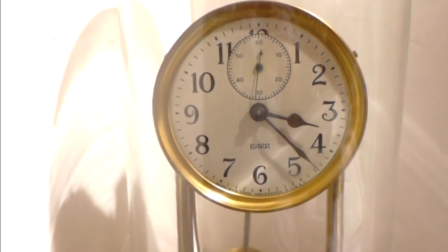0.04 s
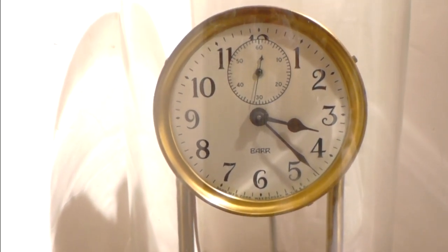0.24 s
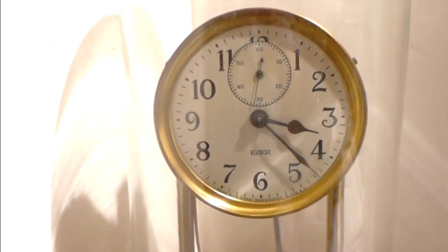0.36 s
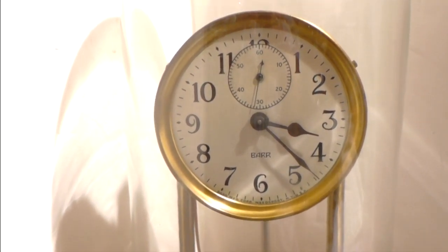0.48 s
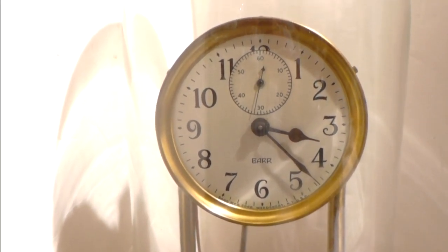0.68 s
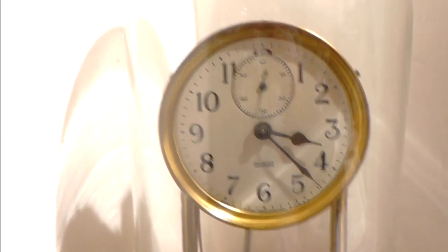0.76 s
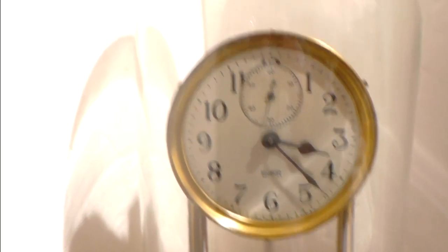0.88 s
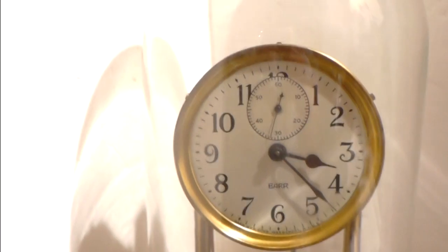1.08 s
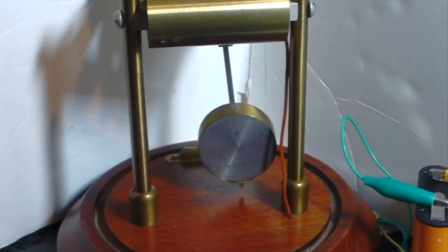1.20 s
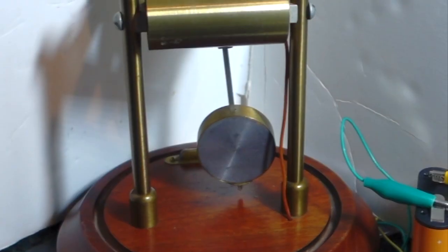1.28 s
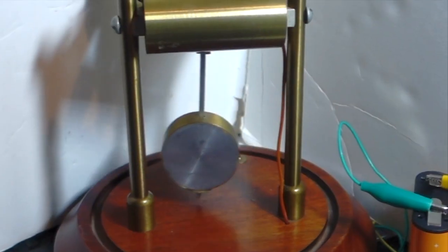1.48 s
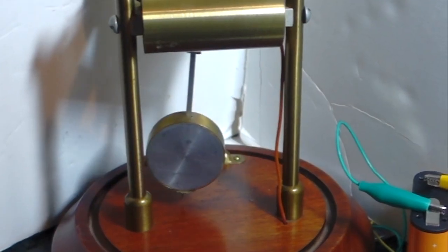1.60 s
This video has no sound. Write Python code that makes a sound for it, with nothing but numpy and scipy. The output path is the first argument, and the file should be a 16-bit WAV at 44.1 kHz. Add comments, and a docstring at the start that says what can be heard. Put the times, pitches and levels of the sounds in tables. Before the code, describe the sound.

An electric pendulum clock clicks close by, slightly right, over steady hiss in a small room. After a soft rub, a ratchet knocks and drags from 0.1 to 0.4 seconds. At 0.6 a lever clacks loudly, ringing the brass case. Light ticks and a rub follow. The sound drops out briefly near 1.2, returning with thinner hiss. Around 1.6 a contact chatters and a last rub begins.

```python
"""An electric pendulum clock, close by and a little to the right, in a small room with steady hiss.
After a soft rub, a pawl knocks and drags over a ratchet wheel (0.11-0.44 s).
A lever drops with a loud clack that rings the brass case (0.57 s). Light ticks and a rub follow.
After a short silence (1.24 s) the hiss is thinner; the pendulum contact closes and chatters (1.57 s),
and a last rub begins."""
import sys
import numpy as np
from scipy import signal
from scipy.fft import rfft, irfft
from scipy.io import wavfile

SR = 44100
rng = np.random.default_rng(int(sys.argv[2]) if len(sys.argv) > 2 else 0)


def int16_out(signal):
    """Quantize to a 16-bit WAV file."""
    q = np.round(np.clip(np.atleast_2d(signal).T, -1, 1) * 32767)
    wavfile.write(sys.argv[1], SR, q.astype(np.int16))


N = 72765

# Stereo image: freq_hz, right_minus_left_db
STEREO_LEAN = [(200, 0), (600, 1), (1100, 2), (2000, 5.5), (3600, 9), (6400, 8), (11000, 8)]
# Left-right likeness: freq_hz, correlation
STEREO_COHERENCE = [(60, 0.88), (300, 0.93), (650, 0.75), (1200, 0.69), (2500, 0.31), (5400, 0.041),
                    (11000, 0.011)]
# Hiss spectra before and after the silence: freq_hz, relative_db
FULL_HISS_SPECTRUM = [(30, -29), (65, -14), (110, -10.5), (240, -1.5), (480, -3.5), (630, 3.5), (760, -1.5),
                      (920, 4), (1420, 2.5), (1950, 4), (2300, -2), (3200, -7), (4200, -7.5), (5500, -10.5),
                      (11000, -10.5)]
THIN_HISS_SPECTRUM = [(30, -38), (100, -37), (200, -16.5), (480, -17), (640, -4), (820, -6.5), (950, -2.5),
                      (1200, -4.5), (1400, -8), (1850, 0), (2500, -11), (3500, -15), (4000, -12),
                      (5500, -16), (11000, -15)]
# Hollow notes in the hiss: pitch_hz, width_hz, level_db
ROOM_RESONANCES = [(623, 67, -80.5), (948, 87, -72.5), (1210, 27, -76), (1748, 76, -81), (1945, 45, -80.5)]
# Strokes of a sliding part: start_s, length_s, level_db
RUB_STROKES = [(-.028, .135, -3), (0.974, .14, 0.5), (1.594, 0.2, 1.5)]
# Resonances of the rub: pitch_hz, width_hz, level_db, peak_stroke_fraction
RUB_RESONANCES = [(2347, 26, -60.5, 0.087), (2730, 68, -68, 0.18), (3910, 850, -66, 0.37),
                  (7920, 240, -79, .5), (10570, 2200, -67, 0.49)]
# Gear train ticks: start_s, level_db, centre_hz, width_octaves, decay_s
GEAR_TICKS = [(.837, -49, 8000, .25, 0.0017), (0.8797, -33.5, 2540, 0.4, 0.0012),
              (.8848, -38, 3000, 0.49, 0.0012), (.931, -46.5, 4630, 0.5, 0.0013),
              (.9315, -41.5, 240, 0.44, 0.0087), (1.1676, -35.5, 2910, 0.47, 0.0015),
              (1.404, -58.5, 4740, 1.7, 0.0088)]
# Impacts: start_s, level_db, treble_db, rise_s
CONTACT_BLOWS = [(1.5665, 0.5, 2, 0.00095), (1.585, 2, -3, .001), (1.598, 3.5, -6, 0.0016),
                 (1.609, 1, -9, 0.0017)]
PAWL_BLOWS = [(.1125, -0.5, 0.5, .0015), (.1175, -4, -5, 0.0027), (.1228, -4.5, -38, .002),
              (.1335, -12.5, 9, 0.00068), (.190, -11, -4.5, 0.0061), (.267, -25.5, 6, .002),
              (.285, -17, 3, 0.005), (.3065, -7, 1.5, 0.0057), (.3285, -3, -0.5, 0.0053),
              (.356, -12, 6.5, 0.0063), (.377, -20, 9, 0.0049), (.398, -10.5, 4.5, 0.0013),
              (.4255, -10.5, 3.5, 0.0043), (.443, -12.5, -43, 0.0022)]
LEVER_BLOWS = [(.5700, -7.5, -3.5, .002), (.5730, -2.5, -0.5, 0.0029), (.5760, -2, -0.5, 0.0025),
               (.5885, -8.5, 2, 0.0017), (.5940, -11.5, 1.5, 0.0017)]
# Dense response of each struck body: freq_hz, ring_db, t60_s, direct_db
SPRING_BODY = [(200, -84, 0.11, -77), (2020, -47, .1, -73), (3080, -58, 0.16, -42.5), (3470, -61, .12, -52),
               (4080, -54, 0.13, -38), (4600, -49.5, 0.16, -56), (6540, -62, 0.18, -51),
               (11100, -57, 0.14, -44)]
MOVEMENT_BODY = [(50, -64, .3, -65), (131, -51, 0.5, -64), (278, -33, 0.53, -49), (430, -33, 0.41, -43),
                 (610, -26.5, 0.31, -19.5), (760, -36, 0.39, -41), (1130, -28.5, 0.22, -22.5),
                 (1800, -39.5, 0.27, -41), (2400, -37, 0.13, -34), (2800, -40.5, 0.23, -46),
                 (3400, -35.5, 0.21, -34), (3690, -43.5, 0.18, -46), (4300, -36.5, 0.13, -42),
                 (4600, -48, 0.21, -67), (5500, -39, 0.096, -38), (5970, -42.5, 0.14, -47),
                 (7200, -35, 0.22, -29.5), (7060, -45, .14, -45), (8000, -32, 0.081, -38.5),
                 (9170, -45, 0.17, -45.5), (11000, -40.5, .16, -38)]
CASE_BODY = [(50, -71, 0.23, -64), (166, -51.5, 0.48, -46), (378, -49, 0.71, -39), (656, -26.5, 0.29, -25),
             (1120, -30.5, 0.45, -31.5), (1940, -29.5, 0.54, -15.5), (2600, -28.5, 0.45, -14.5),
             (3100, -37, 0.44, -26.5), (3760, -32.5, 0.39, -28.5), (5200, -39.5, 0.37, -36.5),
             (6700, -41, 0.46, -33), (7500, -43, 0.43, -37), (9100, -40, 0.4, -41),
             (10900, -41, 0.31, -30.5)]
# Clear modes of each struck body: pitch_hz, level_db, t60_s, right_minus_left_db
SPRING_PARTIALS = [(3975, -63.5, 0.11, 11), (3970, -58, 0.051, 14), (7900, -63, 0.089, 6),
                   (8800, -55, 0.071, 7.4), (10840, -68.5, .15, 6)]
MOVEMENT_PARTIALS = [(343.2, -48.5, 0.26, 0.5), (561, -50, 0.21, 6), (601.8, -46.5, 0.33, -0.5),
                     (648, -50, 0.19, 0), (1045, -49, .3, -1), (1344, -51.5, 0.35, 6), (2369, -44, 0.13, 4),
                     (2424, -48, 0.14, 1), (3106, -48, 0.14, 20), (4050, -53, 0.077, 20),
                     (5060, -58, 0.14, 2), (5520, -53.5, .13, 2), (7340, -50.5, 0.12, 6),
                     (7850, -54.5, 0.15, 21.5)]
CASE_PARTIALS = [(639, -49, 0.32, -3), (952.3, -51.5, 0.36, -1), (1170, -56, 0.55, 0),
                 (1367, -48.5, 0.27, 1), (1463, -44, 0.28, 16), (2145, -49, 0.25, 12),
                 (2443, -56.5, 0.9, 3), (2683, -46, 0.29, 15.5), (2895, -56, 0.45, 9),
                 (3720, -59, 0.22, 24), (4430, -58, .29, 16), (6640, -53, 0.15, 14)]

SILENT_FROM_S, SILENT_TO_S = 1.235, 1.271
TIME_S, FREQ_HZ = np.arange(N) / SR, np.fft.rfftfreq(N, 1 / SR)


def amp(db):
    """Decibels to gain."""
    return 10 ** (np.asarray(db) / 20)


def lookup(table, hz, column=1):
    """Table column interpolated over log frequency."""
    table = np.array(table, float)
    return np.interp(np.log(hz + 1), np.log(table[:, 0] + 1), table[:, column])


def add(mix, start_s, sound):
    """Mix in a stereo sound at start_s."""
    part = mix[:, round(start_s * SR):][:, :sound.shape[1]]
    part += sound[:, :part.shape[1]]


def unit_rms(gain):
    """Scale a spectrum to unit power."""
    return gain / np.sqrt(np.mean(gain ** 2))


def stereo_noise(gain, size, lean_scale=1):
    """Noise shaped by a gain per bin; treble is wider and further right than bass."""
    hz = np.fft.rfftfreq(size, 1 / SR)
    mid, side = rfft(rng.standard_normal((2, size)))
    coherence = lookup(STEREO_COHERENCE, hz)
    mid *= np.sqrt((1 + coherence) / 2)
    side *= np.sqrt((1 - coherence) / 2)
    right_gain = amp(lean_scale * lookup(STEREO_LEAN, hz) / 2)
    return irfft(np.array([(mid + side) / right_gain, (mid - side) * right_gain]) * gain, size)


def resonance(centre_hz, width_hz):
    """Noise in one resonance, near unit level."""
    return stereo_noise(unit_rms(1 / (1 + ((FREQ_HZ - centre_hz) / width_hz) ** 2)), N)


def room_hiss(sag_db_per_s=2.5, swell_s=0.11):
    """Slowly sagging hiss with hollow notes; after the silence it is thinner and swells in."""
    full = stereo_noise(unit_rms(amp(lookup(FULL_HISS_SPECTRUM, FREQ_HZ))), N)
    full *= amp(-58.5 - sag_db_per_s * TIME_S)
    thin = stereo_noise(unit_rms(amp(lookup(THIN_HISS_SPECTRUM, FREQ_HZ))), N, lean_scale=0.77)
    thin *= amp(-62 - 4 * np.exp(-np.maximum(TIME_S - SILENT_TO_S, 0) / swell_s))
    notes = sum(amp(db) * resonance(hz, width_hz) for hz, width_hz, db in ROOM_RESONANCES)
    return np.where(TIME_S < SILENT_FROM_S, full, thin) + notes


def rubs(attack_s=0.0043, spread_fraction=0.37):
    """Sliding friction excites each resonance most at its own point of the stroke."""
    out = np.zeros((2, N))
    for pitch_hz, width_hz, level_db, peak_fraction in RUB_RESONANCES:
        band = resonance(pitch_hz, width_hz)
        for start_s, length_s, stroke_db in RUB_STROKES:
            age_s = TIME_S - start_s
            attack = np.clip(age_s / attack_s, 0, 1)
            swell = np.exp(-0.5 * ((age_s / length_s - peak_fraction) / spread_fraction) ** 2)
            out += amp(level_db + stroke_db) * attack * swell * band
    return out


def squeak(from_hz=2350, to_hz=1357, width_hz=220, level_db=-64, growth_db=4, fade_fraction=0.23):
    """Narrow friction noise that falls in pitch and grows through each rub."""
    out = np.zeros((2, N))
    for start_s, length_s, stroke_db in RUB_STROKES:
        progress = np.clip((TIME_S - start_s) / length_s, 0, 1)
        shift = np.exp(2j * np.pi * np.cumsum((to_hz - from_hz) * progress) / SR)
        band = (signal.hilbert(resonance(from_hz, width_hz)) * shift).real
        fade = np.clip(np.minimum(progress, 1 - progress) / fade_fraction, 0, 1)
        out += amp(level_db + stroke_db + growth_db * progress) * fade * band
    return out


def gear_ticks(size=4096, tail_db=-22, tail_s=0.019):
    """Dry ticks of the gear train: noise bursts with a faint room tail."""
    out = np.zeros((2, N))
    age_s, hz = np.arange(size) / SR, np.fft.rfftfreq(size, 1 / SR)
    for start_s, level_db, centre_hz, width_octaves, decay_s in GEAR_TICKS:
        colour = np.exp(-0.5 * (np.log2((hz + 1) / centre_hz) / width_octaves) ** 2)
        envelope = np.exp(-age_s / decay_s) + amp(tail_db) * np.exp(-age_s / tail_s)
        add(out, start_s, amp(level_db) * stereo_noise(colour, size) * envelope)
    return out


def treble_share(hz, corner_hz=2480):
    """High-shelf weight, 0 to 1."""
    return hz ** 2 / (hz ** 2 + corner_hz ** 2)


def strikes(blows, body, partials, direct_decay_s, direct_pan_db, shadow_hz=800, size=24576):
    """Each blow gives a short direct burst, a dense ring and clear decaying modes."""
    out = np.zeros((2, N))
    age_s, hz = np.arange(size) / SR, np.fft.rfftfreq(size, 1 / SR)
    sides = np.array([[-0.5], [0.5]])
    shadow_db = sides * direct_pan_db * hz ** 4 / (hz ** 4 + shadow_hz ** 4)  # pans the highs only
    for start_s, level_db, treble_db, rise_s in blows:
        tilt_db = treble_db * treble_share(hz)
        ring_noise = stereo_noise(amp(lookup(body, hz) + tilt_db), size)
        band_hz, frame_s, bands = signal.stft(ring_noise, SR, nperseg=256)
        bands *= amp(-60 * frame_s / lookup(body, band_hz, column=2)[:, None])
        ring = signal.istft(bands, SR)[1][:, :size]
        direct = stereo_noise(amp(lookup(body, hz, column=3) + tilt_db + shadow_db), size, lean_scale=1.06)
        direct *= np.exp(-age_s / direct_decay_s)
        for pitch_hz, mode_db, t60_s, lean_db in partials:
            phase_gap_rad = np.arccos(lookup(STEREO_COHERENCE, pitch_hz))
            mode = np.sin(2 * np.pi * pitch_hz * age_s + sides * phase_gap_rad) * amp(-60 * age_s / t60_s)
            ring += amp(mode_db + treble_db * treble_share(pitch_hz) + sides * lean_db) * mode
        attack = np.minimum(age_s / rise_s, 1)
        add(out, start_s, amp(level_db) * attack * (direct + ring))
    return out


def pendulum_contact():
    """The contact closes and chatters, ringing its spring."""
    return strikes(CONTACT_BLOWS, SPRING_BODY, SPRING_PARTIALS, direct_decay_s=0.0062, direct_pan_db=-5)


def pawl():
    """The pawl knocks over the ratchet wheel, ringing the movement."""
    return strikes(PAWL_BLOWS, MOVEMENT_BODY, MOVEMENT_PARTIALS,
                   direct_decay_s=0.0085, direct_pan_db=-0.5)


def lever():
    """The lever lands and rebounds, ringing the brass case."""
    return strikes(LEVER_BLOWS, CASE_BODY, CASE_PARTIALS, direct_decay_s=0.0053, direct_pan_db=4)


def scene():
    """Room hiss plus the clock's parts."""
    return room_hiss() + rubs() + squeak() + gear_ticks() + pendulum_contact() + pawl() + lever()


def record(dry, low_cut_hz=120, high_cut_hz=11090, fade_out_s=0.013, fade_in_s=0.022):
    """Microphone low cut, brief dropout, band limit."""
    highpassed = signal.sosfilt(signal.butter(2, low_cut_hz, "highpass", fs=SR, output="sos"), dry)
    fade_out = np.clip((SILENT_FROM_S - TIME_S) / fade_out_s, 0, 1)
    fade_in = np.clip((TIME_S - SILENT_TO_S) / fade_in_s, 0, 1)
    lowpass = signal.firwin(513, high_cut_hz, window=("kaiser", 8), fs=SR)
    return signal.oaconvolve(highpassed * (fade_out + fade_in) ** 3, lowpass[None], "same", axes=1)


dry = scene()
out = record(dry)
int16_out(out)
```